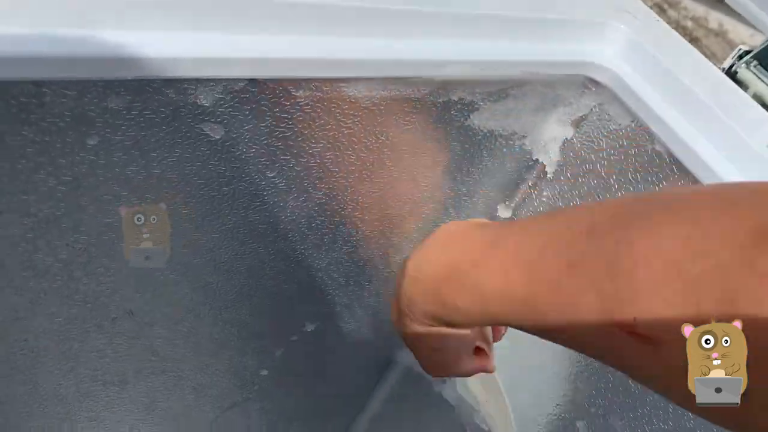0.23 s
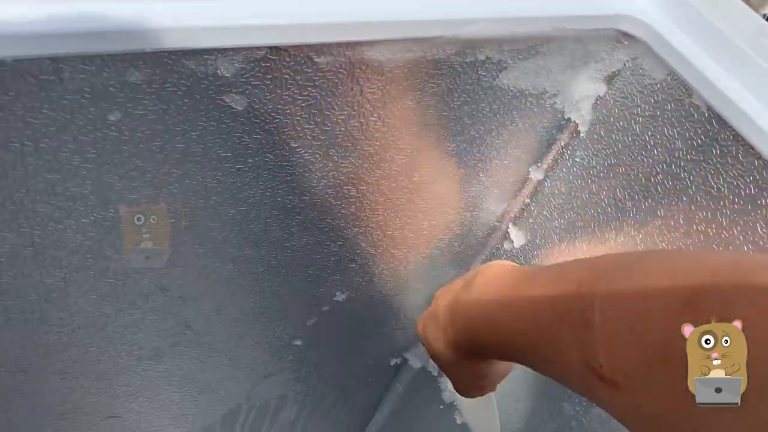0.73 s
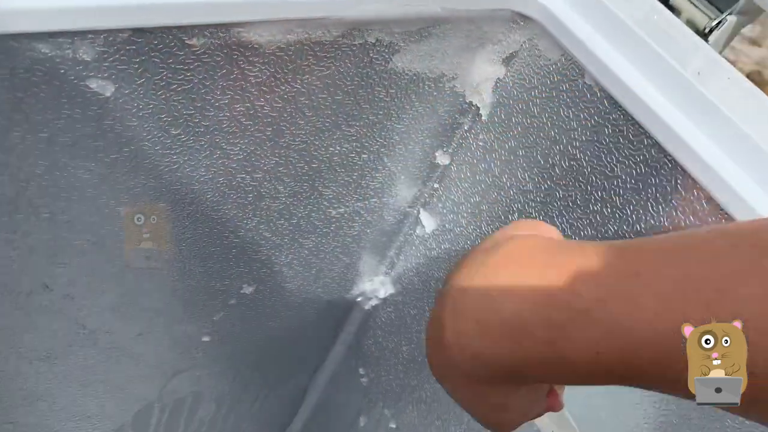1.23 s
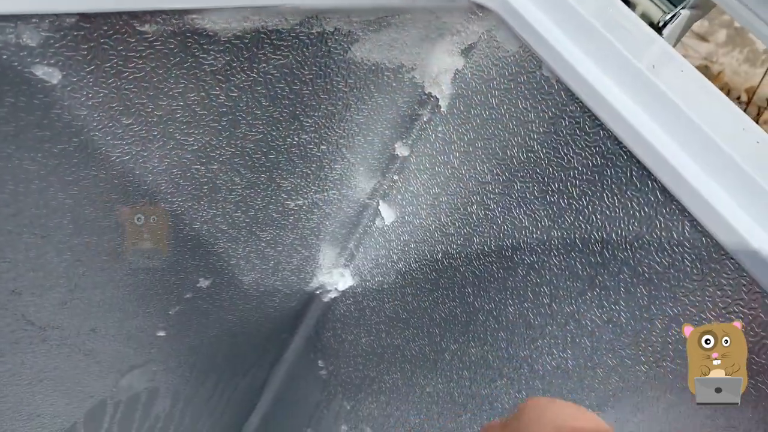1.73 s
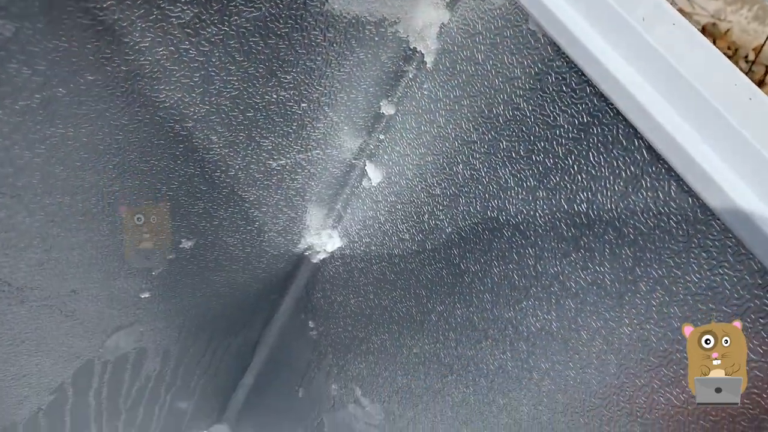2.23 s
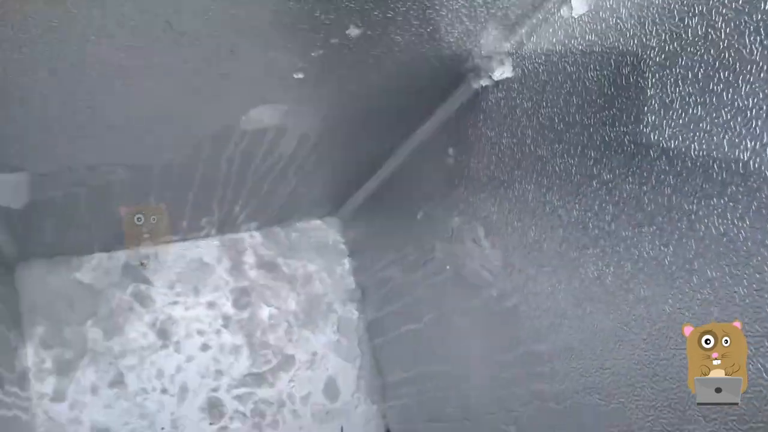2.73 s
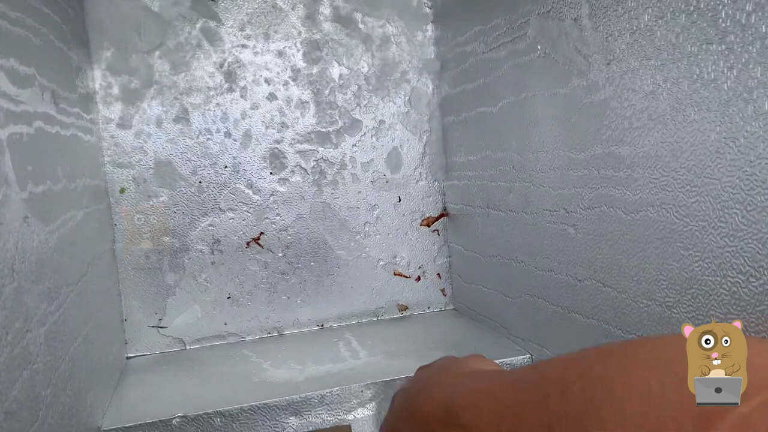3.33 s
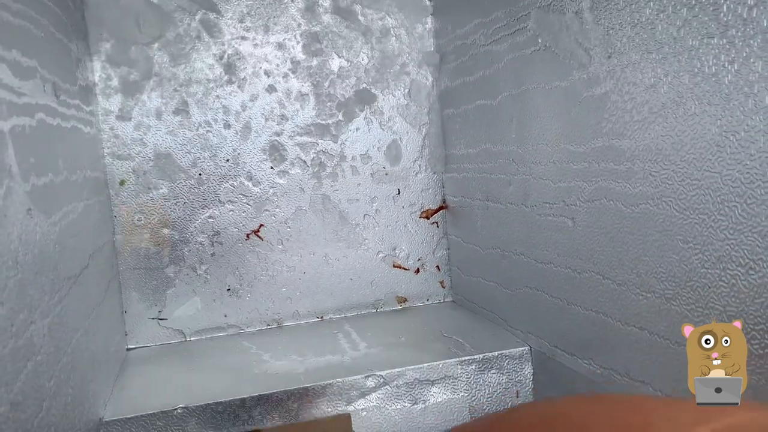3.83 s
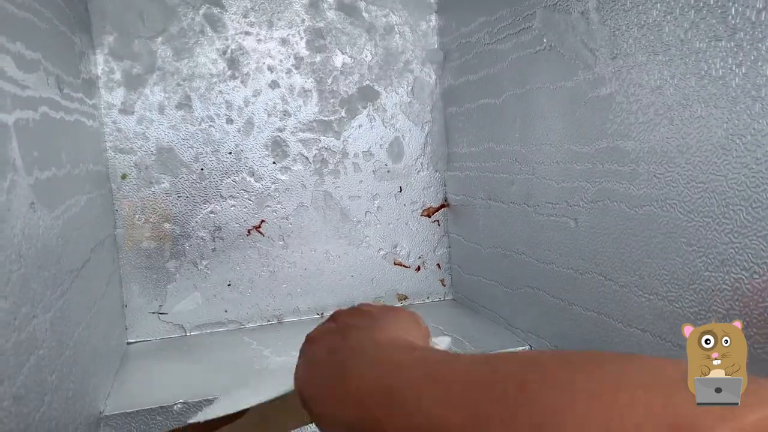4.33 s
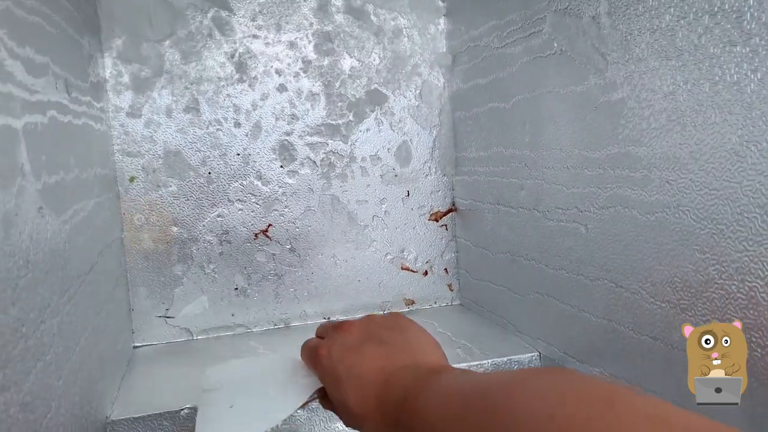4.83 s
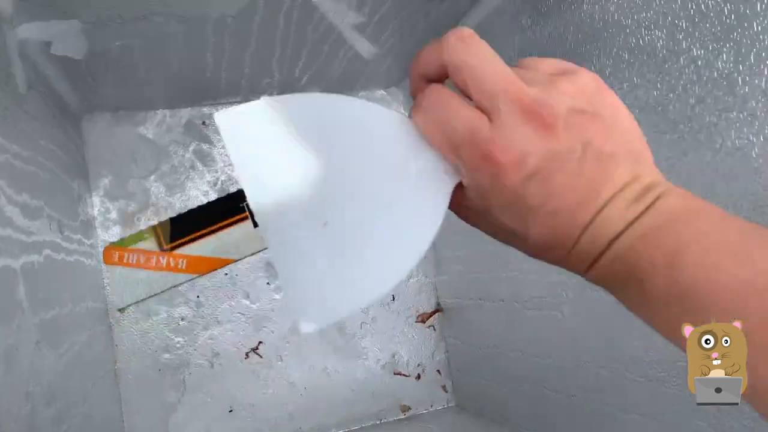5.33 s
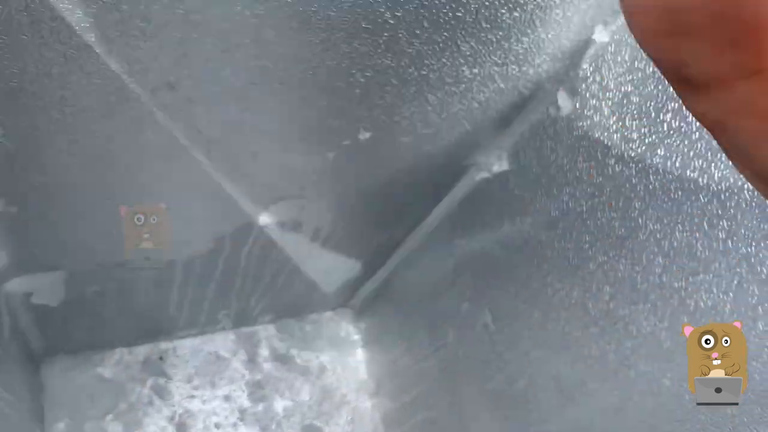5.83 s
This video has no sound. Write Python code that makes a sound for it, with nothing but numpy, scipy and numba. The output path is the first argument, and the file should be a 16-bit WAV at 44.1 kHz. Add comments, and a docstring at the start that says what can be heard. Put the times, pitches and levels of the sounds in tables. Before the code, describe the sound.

Inside an open chest freezer, heard very close in stereo with tight, boxy reflections. From 0 to 1.4 s a plastic scraper shaves frost in short uneven strokes: dry rasp, crunch and bright crystal fizz, the flexing blade ringing around 2 kHz, chips snapping and the liner knocking. A sharp knock lands at 1.54 s, another brief scrape at 1.9 s and a light chip at 2.3 s. A lull follows, with faint rings and thin high squeaks near 2.6 s. From 3.05 to 4 s, deeper scrapes and hard cracks make the bare wall ring, with heavy hollow knocks around 3.6 to 3.85 s. A soft cardboard rub comes near 4.3 s, then small scrapes and a thump at 4.6-4.85 s. Soft low rings end it by 5.6 s. A low hum of about 90 Hz swells and fades throughout, over rumble, hollow rustle and faint outdoor hiss.

```python
"""Inside an open chest freezer, at two close ports, a plastic scraper shaves frost off the liner in short strokes:
random crystal fractures rasp, crunch and fizz, chips snap off, and knocks, lumps and rustles ring wall modes.
The blade rings at first; after a lull of faint rings and thin squeaks, mostly deeper scrapes ring the bare wall.
Near 4.3 s comes a soft rub on a cardboard box; soft rings end it. Throughout, a sine hum swells and fades
in the tub over shaped noise: rumble, hollow rustle, open air and a faint outdoor hiss."""
import sys
import numpy as np
from scipy import signal
from scipy.fft import rfft, irfft, next_fast_len
from scipy.io import wavfile
from scipy.ndimage import uniform_filter1d
from numba import njit

SR = 44100
rng = np.random.default_rng(int(sys.argv[2]) if len(sys.argv) > 2 else 0)


def wav_out(sig):
    """Save sig, one row per channel (or a flat mono array), as 16-bit PCM at SR to the path in sys.argv[1]."""
    wavfile.write(sys.argv[1], SR, np.round(np.clip(np.atleast_2d(sig).T, -1, 1) * 32767).astype(np.int16))


N = 268701
TIME = np.arange(N) / SR

# colour of the finest fractures: f/Hz, level/dB
FIZZ = [(3500, -1), (4800, 0), (6300, 2), (8500, 1.5), (10500, 0.5), (13500, 1), (14400, 2.5), (15000, -9),
        (16000, -23)]
# modes of the liner and the air in it: f/Hz, level/dB, t60/s
LINER = [(73.5, 1, 0.088), (141.7, 2, 0.29), (227.5, 3, 0.22), (242, 1.5, 0.12), (329.5, 5, 0.095),
         (384.6, 0, 0.11), (457.3, -1, 0.063), (525, 4, 0.11), (559.5, 4.5, 0.093), (637.5, -1, 0.091),
         (708, 0, 0.06), (890, -8, 0.17), (964, 4.5, 0.048), (1044, 1.5, 0.068), (1122, -4, 0.12),
         (1400, -16, 0.13), (2638, 0.5, 0.059), (3320, 2, 0.11)]


def from_db(db):
    """Amplitude ratio of a level in dB."""
    return 10 ** (np.asarray(db) / 20)


def rms_one(x):
    """Scale the whole signal to rms 1."""
    return x / np.sqrt(np.mean(x ** 2) + 1e-20)


def in_time(rows):
    """Each column of a curve at every sample."""
    s, *columns = np.transpose(rows)
    return [np.interp(TIME, s, column) for column in columns]


def bell(offset):
    """Bell curve of height 1; the offset is in standard deviations."""
    return np.exp(-.5 * offset ** 2)


def drift(rate):
    """Smooth chance of spread 1 that changes about rate times a second."""
    # drawn at every 40th sample, with a run-in of 2000 draws
    r = np.exp(-80 * np.pi * rate / SR)
    draws = rng.standard_normal(N // 40 + 2002)
    slow = signal.lfilter([1], [1, -2 * r, r * r], draws)[2000:]
    return np.interp(np.arange(N) / 40, np.arange(len(slow)), rms_one(slow))


def colour(x, spectrum, size=8192):
    """Causal filter along a spectrum, falling steeply past its ends; white noise keeps its power."""
    hz, db = np.transpose(spectrum)
    octave = np.log2(np.maximum(np.fft.rfftfreq(size, 1 / SR), 1))
    points = np.log2(hz)
    outside = np.abs(octave - np.clip(octave, points[0], points[-1]))
    level_db = np.interp(octave, points, db) - np.minimum(30 * outside, 60)
    # folding the cepstrum forward gives the minimum-phase response
    cepstrum = irfft(np.log(from_db(level_db)))
    cepstrum[1:size // 2] *= 2
    cepstrum[size // 2 + 1:] = 0
    response = irfft(np.exp(rfft(cepstrum)))
    return signal.oaconvolve(x, response[None] / np.linalg.norm(response), axes=1)[:, :N]


def noise(spectrum):
    """Stereo noise of rms 1."""
    return rms_one(colour(rng.standard_normal((2, N)), spectrum))


def ring(clicks, hz, t60):
    """A unit click sets a sine of height 1 ringing."""
    r, w = from_db(-60 / (t60 * SR)), 2 * np.pi * hz / SR
    return signal.lfilter([0, np.sin(w)], [1, -2 * r * np.cos(w), r * r], clicks + 1e-18)


def tub(x, direct_db=-6, early_t60=0.027, late_t60=0.15, late_db=-14, size=11000):
    """Dense reflections between close walls, unrelated at the two ports: a quick flurry and a weaker tail."""
    t = TIME[:size]
    decay = from_db(-60 * t / early_t60) + from_db(late_db - 60 * t / late_t60)
    response = rng.standard_normal((2, size)) * decay
    response /= np.linalg.norm(response, axis=1, keepdims=True)
    # the direct sound reaches the right port four samples later
    response[0, 0] += from_db(direct_db)
    response[1, 4] += from_db(direct_db)
    response /= np.linalg.norm(response, axis=1, keepdims=True)
    return signal.oaconvolve(x[None], response, axes=1)[:, :N]


def travelling(x, turns_per_s=1.6):
    """As the blade travels, one pattern of reflections gives way to another."""
    angle = 2 * np.pi * turns_per_s * TIME + drift(4.82)
    return tub(x * np.cos(angle)) + tub(x * np.sin(angle))


def scrape(strokes, rasp_colour, resonator, drum_hz, drum_spread,
           drum_db, rasp_db, crunch_db, ring_db, fizz_db):
    """Coarse fractures drum, rasp, crunch and set a resonator ringing; fine ones add a bright fizz."""
    drum, rasp, fizz, ring_share = stroke_gains(strokes)
    coarse = grains(per_s=4500, spread_db=3.3, slip_db=2.1)
    fine = rms_one(coarse + grains(per_s=8000, spread_db=4, slip_db=4))
    wall = drum * drumming(travelling(coarse), drum_hz, drum_spread)
    grating = colour(travelling(coarse * rasp), rasp_colour)
    crunching = tub(crunch() * rasp, direct_db=0.0)
    ringing = ring_share * rms_one(resonator(grating)) * np.std(grating)
    fizzing = colour(travelling(fine * fizz), FIZZ)
    body = from_db(drum_db) * wall + from_db(rasp_db) * grating + from_db(crunch_db) * crunching
    return body + from_db(ring_db) * ringing + from_db(fizz_db) * fizzing


def stroke_gains(strokes):
    """Drumming, rasp and fizz follow contact and pressure; each stroke has its own share of ringing."""
    # the drumming lingers (times the release) and follows only a share of the pressure
    drum_lingers, drum_follows = 1.53, 0.14
    drum, rasp, fizz, ring_share = np.zeros((4, N))
    for start, push_s, release_s, db, rise_db, drum_db, ring_db, fizz_db in strokes:
        pressed_db = pressure(start, push_s, rise_db)
        gain = contact(start, push_s, release_s) * from_db(db + pressed_db)
        shaken_db = db + drum_db + drum_follows * pressed_db
        shaken = contact(start, push_s, drum_lingers * release_s) * from_db(shaken_db)
        # where strokes overlap, the loudest rasp sets the ringing
        ring_share = np.where(gain > rasp, from_db(ring_db), ring_share)
        drum = np.maximum(drum, shaken)
        rasp = np.maximum(rasp, gain)
        fizz = np.maximum(fizz, from_db(fizz_db) * gain)
    return drum, rasp, fizz, uniform_filter1d(ring_share, size=400)


def pressure(start, push_s, rise_db):
    """The hand bears down evenly over the push: dB about its middle."""
    return rise_db * (np.clip((TIME - start) / push_s, 0, 1) - .5)


def contact(start, push_s, release_s, attack_s=0.0088):
    """The stroke bites quickly, holds through the push and eases off."""
    early = np.maximum(start - TIME, 0)
    late = np.maximum(TIME - start - push_s, 0)
    return np.exp(-.5 * np.minimum((early / attack_s) ** 2 + (late / release_s) ** 2, 60))


def grains(per_s, spread_db, slip_db, size=700):
    """Crystals break at random, in clumps as the blade sticks and slips; the mean power stays about 1."""
    sizes_db = spread_db * np.minimum(rng.exponential(1, N), 4) + slip_db * drift(103)
    sizes = from_db(sizes_db) * rng.choice([-1, 1], N)
    clicks = sizes * (rng.random(N) < per_s / SR)
    # level out the power over a window of size samples
    return clicks / np.sqrt(np.abs(uniform_filter1d(clicks ** 2, size)) + 1e-6)


def drumming(shaking, centre_hz, spread):
    """The liner's modes within some octaves of the centre answer the shaking; rms 1."""
    total = 0
    for k, (hz, db, t60) in enumerate(LINER):
        share = from_db(db) / np.sqrt(t60) * bell(np.log2(hz / centre_hz) / spread)
        total = total + (-1) ** k * share * ring(shaking, hz, t60)
    return rms_one(total)


def crunch(per_s=190, spread_db=3.0, cycles=13, low_hz=1400, high_hz=7500, count=18):
    """Larger crystals crack one by one, each ringing briefly at one of several pitches; rms 1."""
    sizes = from_db(spread_db * np.minimum(rng.exponential(1, N), 3)) * rng.choice([-1, 1], N)
    clicks = sizes * (rng.random(N) < per_s / SR)
    dealt = rng.integers(0, count, N)
    pitches = np.geomspace(low_hz, high_hz, count)
    # every pitch dies by 60 dB in the same number of cycles
    return rms_one(sum(hz * ring(clicks * (dealt == k), hz, cycles / hz) for k, hz in enumerate(pitches)))


@njit
def moving_resonance(x, turn, r):
    """A two-pole resonance whose centre (radians a sample) moves."""
    out = np.zeros(len(x))
    for i in range(2, len(x)):
        driven = (1 - r * r) / 2 * (x[i] - x[i - 2])
        out[i] = driven + 2 * r * np.cos(turn[i]) * out[i - 1] - r * r * out[i - 2]
    return out


def blade_flex(x, width_hz=260, wander=0.081):
    """The flexing blade is a resonance whose pitch follows a curve and wanders at random about it."""
    # middle pitch of the flexing blade: t/s, f/Hz
    blade_pitch = [(0.17, 1960), (0.21, 1940), (0.25, 2200), (0.3, 1980), (0.44, 1750), (0.52, 2000),
                   (0.56, 2500), (0.63, 2000), (0.72, 2050), (0.78, 1850), (0.9, 2350), (1.19, 2330),
                   (1.25, 1960), (1.41, 1850), (1.91, 2200), (1.98, 1800), (2.04, 2100)]
    centre = in_time(blade_pitch)[0] * np.exp(wander * drift(24))
    turn, r = 2 * np.pi * centre / SR, np.exp(-np.pi * width_hz / SR)
    return np.array([moving_resonance(side, turn, r) for side in x])


def wall_sheet(x):
    """The bare wall rings at fixed resonances, most of them narrow."""
    # ringing of the bare lower wall: f/Hz, width/Hz, level/dB
    sheet = [(970, 190, 1), (1154, 88, -0.5), (1393, 33, -3), (1590, 84, 1.5), (1706, 53, -3.5),
             (1970, 81, 2), (2556, 43, -2), (3230, 88, -17), (3300, 21, -10), (3750, 57, -11)]
    total = 0
    for k, (hz, width, db) in enumerate(sheet):
        b, a = signal.iirpeak(hz, hz / width, fs=SR)
        total = total + (-1) ** k * from_db(db) * signal.lfilter(b, a, x)
    return total


def chips(rasp_db, fizz_db, snap_db=9, rise_s=0.00079):
    """Each chip breaks away with one sharp snap and a quick, dying run of fractures."""
    # chips snapping off: t/s, rasp level/dB, fizz level/dB, decay of the fractures/s
    chip_rows = [(0.1304, -11.5, -12.5, 0.00095), (0.168, -8, -36, 0.0052), (0.253, -8, -15, 0.013),
                 (0.547, -23, -21, 0.011), (0.584, -5, -11.5, 0.0038), (0.916, -15, -33, 0.0014),
                 (0.938, -30, -22.5, 0.0056), (0.958, -10, -28, 0.0019), (0.975, -4.5, -13.5, 0.0043),
                 (1.091, -24, -34, 0.002), (1.1178, -14, -19, 0.0093), (1.34, -27, -5, 0.0034),
                 (1.5403, -11, -9, 0.0037), (1.552, -22, -31, 0.02), (1.6013, -21.5, -25.5, 0.0053),
                 (1.6591, -14, -23, 0.0037), (1.6900, -38, -35, 0.0043), (1.7235, -25.5, -24.5, 0.003),
                 (1.903, -17, -35, 0.008), (1.912, 1.5, -19, 0.0031), (1.998, -13, -20, 0.0072),
                 (2.2781, -8.5, -16, 0.0088), (3.0474, -9, -23, 0.0041), (3.2054, -30, -35, 0.0048),
                 (3.254, -9, -18, 0.007), (3.301, -14, -32, 0.002), (3.3297, 1.5, -5, 0.0017),
                 (3.385, -4, -24, 0.002), (3.398, -4, -21, 0.0014), (3.402, -6, -4, 0.002),
                 (3.430, -12, -11.5, 0.0028), (3.615, -21, -26.5, 0.0055), (3.621, 1, -5, 0.003),
                 (3.625, -5.5, -5, 0.0026), (3.643, -29, -29, 0.041), (3.693, -19, -31, 0.0091),
                 (3.7393, -49, -36.5, 0.01), (3.83, -7.5, -27, 0.0047), (3.8405, -6.5, -31, 0.0046),
                 (3.8817, -21, -28, 0.0022), (3.908, -4.5, -19, 0.0049), (3.931, -13, -35, 0.0025),
                 (4.324, -15.5, -21.5, 0.0062), (4.609, -24, -19.5, 0.0034), (4.6764, -15.5, -22, 0.0037)]
    runs, snaps = np.zeros((2, 2, N))
    for s, chip_rasp_db, chip_fizz_db, length in chip_rows:
        at, gains = int(s * SR), from_db([chip_rasp_db, chip_fizz_db])
        t = TIME[:min(SR // 2, N - at)]
        run = np.exp(-t / max(length, 1e-4)) * (1 - np.exp(-t / rise_s))
        runs[:, at:at + len(t)] += gains[:, None] * run
        snaps[:, at] += from_db(snap_db) * gains
    cracks = grains(per_s=7000, spread_db=2.8, slip_db=0, size=110)
    rasp, fizz = (travelling(cracks * run) + tub(snap, direct_db=4.5) for run, snap in zip(runs, snaps))
    # f/Hz, level/dB
    chip_colour = [(500, 3.0), (1050, -6), (1400, 0.0), (2300, 4), (3200, 0.5), (4300, -2.0), (5500, -6.0)]
    return from_db(rasp_db) * colour(rasp, chip_colour) + from_db(fizz_db) * colour(fizz, FIZZ)


def catches(level_db, width_hz=300):
    """Quick slips of the edge ring the blade: narrow noise in a short swell, some of it gliding in pitch."""
    # slips of the blade's edge: t/s, level/dB, f/Hz, half length/s, glide/(Hz per s)
    catch_rows = [(0.226, -15.5, 2010, 0.0093, 3000), (0.59, -21, 2320, 0.014, -3000),
                  (0.712, -17, 2055, 0.0074, 0), (0.77, -15, 1857, .007, -4000),
                  (0.979, -21.5, 2420, 0.0046, 0), (1.263, -19, 1810, 0.0086, -8000),
                  (1.344, -12.5, 1937, 0.0071, 0), (1.396, -21, 1810, 0.0079, -3000),
                  (1.543, -17, 2260, 0.0027, 2), (1.919, -16.5, 2180, 0.0033, 2),
                  (1.981, -16.5, 1813, 0.008, -3), (3.412, -21, 1765, 0.016, -9000)]
    out = np.zeros((2, N))
    narrow = signal.butter(2, width_hz / 2, fs=SR, output="sos")
    for s, db, hz, half, glide in catch_rows:
        span = slice(int((s - 4 * half) * SR), int((s + 4 * half) * SR))
        t = TIME[span] - s
        swell = bell(t / half)
        phase = 2 * np.pi * (hz + glide * t / 2) * t
        # two slow noises on cosine and sine make a band of noise about the pitch
        a, b = signal.sosfilt(narrow, rng.standard_normal((2, 2, SR // 3)))[:, :, -len(t):]
        rung = swell * (a * np.cos(phase) + b * np.sin(phase))
        out[:, span] += from_db(db) * rms_one(rung) * np.sqrt(np.mean(swell ** 2))
    return from_db(level_db) * out


def liner_rings(level_db, unlike=0.98, detune=0.0087, size=16000):
    """Each event rings the liner's modes near its own centre, as damped sines that start sharp."""
    # short rings of the liner's modes: knocks, falling lumps, soft rustles, and the body and slips
    # of scrapes: t/s, level/dB, centre of the modes f/Hz, spread/octaves
    ring_rows = [(0.041, -15, 79, 0.44), (.178, -4.5, 510, 0.42), (0.265, -12, 1100, 0.183),
                 (0.275, -7, 252, 0.7), (0.309, -9, 690, 0.49), (0.551, -17.5, 198, 0.41),
                 (.730, -13, 420, 0.59), (.778, -6, 605, 0.56), (1.12, -16.5, 167, 0.76),
                 (1.186, -15, 198, 1.2), (1.245, -11.5, 390, 0.3), (1.28, -16, 553, 0.23),
                 (1.302, -8, 370, 0.32), (1.326, -30, 930, 0.2), (1.39, -24, 550, 0.24),
                 (1.541, -4, 430, 0.9), (1.912, -13.5, 150, 0.47), (1.915, -7, 420, 0.63),
                 (1.997, -16.5, 460, 0.15), (2.279, -22, 296, 0.52), (2.524, -27, 393, 1.1),
                 (2.587, -29.5, 560, 1), (2.623, -32.5, 600, 1.1), (2.698, -28, 283, 0.5),
                 (2.769, -27, 75, 0.4), (3.050, -18, 487, 0.61), (3.069, -14, 1110, 0.11),
                 (3.072, -7, 348, 0.34), (3.255, -8, 1120, 0.13), (3.258, -15.5, 594, 0.25),
                 (3.331, -10, 620, 0.6), (3.359, -9, 700, 0.65), (3.383, -5.5, 700, 0.53),
                 (3.418, -15, 2650, 0.16), (3.428, -10, 2650, 0.21), (3.431, -31, 1400, 0.19),
                 (3.623, -2.5, 223, 0.15), (3.628, -5.5, 635, 0.92), (3.697, -2.5, 596, 0.51),
                 (3.698, 0.5, 297, 0.14), (3.833, -2, 746, 0.42), (3.839, -7.5, 1066, 0.14),
                 (3.842, -10.5, 550, 0.18), (3.927, -11.5, 650, 0.7), (4.333, -20.5, 225, 0.17),
                 (4.422, -18, 270, 0.42), (4.449, -27, 286, 0.17), (4.545, -28.5, 294.9, 0.54),
                 (4.612, -24.5, 318, 0.3), (4.697, -12, 636, 0.26), (4.704, -11, 263, 0.6),
                 (4.798, -25, 650, 0.88), (5.018, -24, 296, 0.31), (5.385, -21, 284, 0.32),
                 (5.441, -21.5, 276, 0.27), (5.497, -24.5, 285, 0.32), (5.61, -22.5, 288, 0.2)]
    # a mode builds up over a few cycles, so the low ones come late;
    # it starts sharp and settles as the wall springs back
    build_cycles, sharp_share, settle_s = 1.1, 0.067, 0.0095
    hz, mode_db, t60 = np.transpose(LINER)[:, :, None]
    t, out = TIME[:size], np.zeros((2, N + size))
    settling = t + sharp_share * settle_s * (1 - np.exp(-t / settle_s))
    envelope = (1 - np.exp(-(t * hz / build_cycles) ** 2)) * from_db(-60 * t / t60)
    # each standing wave reaches the two ports with its own strengths
    ports = 1 + unlike * (-1) ** np.arange(len(hz)) * np.array([[1], [-1]])
    for s, db, centre_hz, spread in ring_rows:
        share = from_db(mode_db) * bell(np.log2(hz / centre_hz) / spread)
        pitch = hz * (1 + detune * rng.standard_normal(hz.shape))
        rings = share / np.linalg.norm(share) * envelope * np.sin(2 * np.pi * pitch * settling)
        at = int(s * SR)
        out[:, at:at + size] += from_db(db) * ports @ rings
    return from_db(level_db) * out[:, :N]


def squeaks(flutter_db):
    """Brief swells of thin, high, fluttering noise."""
    # swells: t/s, level/dB, half length/s
    squeak_rows = [(1.469, -45.5, 0.17), (2.558, -37, 0.02), (2.619, -31.5, 0.014), (2.8, -55, 0.047)]
    # colour: f/Hz, level/dB
    squeak_colour = [(7300, -30), (8200, 22), (8800, 15.5), (9600, 6), (11000, -4.5), (14000, -12)]
    swell = sum(from_db(db) * bell((TIME - s) / half) for s, db, half in squeak_rows)
    return swell * from_db(flutter_db * drift(90)) * noise(squeak_colour)


def hum(level_db, waver=0.5, flutter_db=1.87, port_phase=0.91):
    """A low sine in the tub whose pitch and level waver; the right port leads by port_phase radians."""
    # pitch: t/s, f/Hz
    hum_pitch = [(0.0, 96.1), (0.25, 91.5), (0.54, 96.6), (0.93, 94.6), (1.05, 84.3), (1.15, 89.9),
                 (2.26, 92.3), (2.83, 96.2), (3.0, 93.7), (6.09, 89.5)]
    # level: t/s, level/dB
    hum_level = [(0.0, -32), (0.27, -26), (0.32, -53), (0.39, -29.5), (1.07, -46), (1.15, -29.5),
                 (1.42, -54), (1.91, -30), (1.95, -19), (2.07, -35.5), (2.44, -28), (2.83, -37.5),
                 (3.05, -21), (3.2, -21), (3.32, -30), (3.43, -28), (3.46, -45), (3.61, -26), (4.02, -36),
                 (4.19, -21.5), (4.68, -35.5), (4.76, -22.5), (5.0, -35), (5.12, -21), (5.3, -19),
                 (5.4, -24), (5.58, -24), (5.63, -54), (5.68, -26), (5.95, -34), (6.0, -24), (6.09, -23)]
    turned = 2 * np.pi * np.cumsum(in_time(hum_pitch)[0]) / SR
    phase = turned + waver * drift(3.5) + port_phase * np.array([[0], [1]])
    return from_db(in_time(hum_level)[0] + level_db + flutter_db * drift(8.7)) * np.sin(phase)


def rumble(level_db, gust_db=-1.0):
    """Deep noise whose level wavers."""
    # colour: f/Hz, level/dB
    rumble_colour = [(20, 1), (33, -9.5), (50, 0), (72, 4), (110, -5.5), (160, -13.5), (260, -39)]
    # level: t/s, level/dB
    rumble_level = [(0, -17.5), (.24, -30), (.36, -39.5), (1.22, -42), (1.45, -48), (1.7, -41),
                    (2.5, -40.5), (2.8, -33), (3.5, -47), (4.0, -41.5), (5.2, -36.5), (6.09, -32)]
    return from_db(in_time(rumble_level)[0] + level_db + gust_db * drift(13)) * noise(rumble_colour)


def hollow_rustle(level_db, flicker_db=3):
    """Low, flickering noise around the tub."""
    # colour: f/Hz, level/dB
    hollow_colour = [(110, -14.5), (170, -5.5), (260, 4), (340, -3.5), (420, -22), (600, -27)]
    # level: t/s, level/dB
    hollow_level = [(0, -30), (.25, -30.5), (.9, -47), (1.22, -31.5), (1.45, -40), (2.7, -46), (2.95, -36),
                    (3.5, -54.5), (3.8, -30), (4.15, -48), (4.7, -30.5), (5.0, -36.5), (5.6, -34),
                    (6.09, -40)]
    return from_db(in_time(hollow_level)[0] + level_db + flicker_db * drift(8.4)) * noise(hollow_colour)


def open_air(level_db, breeze_db=0.9):
    """Mid-range noise of the open air, gently wavering."""
    # colour: f/Hz, level/dB
    air_colour = [(300, -4.5), (450, -2), (650, 4), (900, -3.5), (1400, -11.5), (2500, -11), (3500, -14.5)]
    # level: t/s, level/dB
    air_level = [(0, -37.5), (1.8, -44), (2.4, -43.5), (2.8, -41.5), (3.2, -43.5), (3.6, -48.5), (4.2, -45),
                 (5.0, -40.5), (5.6, -40.5), (6.09, -41)]
    return from_db(in_time(air_level)[0] + level_db + breeze_db * drift(4)) * noise(air_colour)


def far_hiss(level_db):
    """Faint treble noise from outdoors, following a slow level curve."""
    # colour: f/Hz, level/dB
    hiss_colour = [(3400, -5.5), (5000, 0), (7000, -4), (9000, -10), (11000, -18.5), (14000, -19.5),
                   (16000, -38.5)]
    # level: t/s, level/dB
    hiss_level = [(0, -44), (1.8, -57.5), (2.4, -55.5), (2.8, -50.5), (3.5, -60.5), (4.2, -54),
                  (5.0, -49.5), (5.5, -53.5), (5.9, -49), (6.09, -50)]
    return from_db(in_time(hiss_level)[0] + level_db) * noise(hiss_colour)


def scene():
    """Strokes, chips, catches and rings of the liner inside the tub, over the background."""
    # strokes: start t/s, push/s, release/s, rasp level/dB, rise of pressure over the push/dB,
    # then relative to the rasp: drumming level/dB, ringing level/dB, fizz level/dB
    stroke_rows = [(0.000, 0.0083, 0.016, -33, -10, 1.5, 10.5, -1),
                   (0.052, 0.036, 0.04, -28.5, -1.5, -10.5, 6.5, -6.5),
                   (0.182, 0.13, 0.019, -18, -2, -1.5, 5.5, -6),
                   (0.394, 0.085, 0.053, -28.5, 7, -5, 0, -8.5),
                   (0.563, 0.048, 0.041, -20.5, 0.5, -3, -0.5, -14.5),
                   (0.657, 0.093, 0.032, -19.5, 6, -3, 8.5, -5.5),
                   (0.818, 0.15, .02, -40, -7, -17, 8.5, -5),
                   (0.973, 0.024, 0.024, -40.5, -5, 0.5, -3, 6.5),
                   (1.151, 0.16, 0.055, -26, 15.5, -2.5, 12.5, -3),
                   (1.918, 0.074, 0.025, -22, 2, 0, 9.5, -6), (3.059, 0.014, 0.0078, -22.5, -8, 2, 1, -7),
                   (3.216, 0.04, .01, -39, 12, 9, 6, -6.5), (3.257, 0.12, .01, -26, 8.5, 6.5, 4, -11.5),
                   (3.394, 0.02, 0.015, -15.5, 1.5, 1.5, 2, -9.5),
                   (3.881, 0.042, 0.012, -29.5, -3, 8.5, 7.5, -5),
                   (3.994, 0.0093, 0.0083, -40.5, -5, 0, 3.5, -9.5),
                   (4.242, 0.082, 0.05, -50, 26, 2, -18, -0.5),
                   (4.611, 0.059, 0.017, -42.5, -6, 1, -15, -2),
                   (4.682, 0.032, 0.017, -39, -11, 10, 4, -11),
                   (4.767, 0.033, 0.016, -39.5, 4, 6.5, 3, -3.5),
                   (4.835, 0.016, 0.017, -41.5, 1.5, -4, -12, -5.5)]
    # colour of the rasp of the first strokes: f/Hz, level/dB
    high_rasp = [(330, 0), (540, -3.5), (800, -3), (1080, -4.5), (1330, -0.5), (1650, 0), (2300, 2),
                 (3200, 1), (4200, 1.5), (5800, -15.5), (7500, -0.5)]
    # colour of the rasp of the later strokes: f/Hz, level/dB
    late_rasp = [(380, -15), (580, -2.5), (850, -8.5), (1100, -6.5), (1300, 1.5), (1750, -3), (2100, -2.5),
                 (2700, -1.5), (3300, 1), (4200, -3.5), (5200, -12), (6500, -25)]
    # from here on mostly deeper scrapes on the bare wall; the soft rub near 4.3 s is on a cardboard box
    late_from_s = 2.7
    high_strokes = [row for row in stroke_rows if row[0] < late_from_s]
    late_strokes = [row for row in stroke_rows if row[0] >= late_from_s]
    high = scrape(high_strokes, high_rasp, blade_flex, drum_hz=448, drum_spread=0.56,
                  drum_db=-3.0, rasp_db=-4.0, crunch_db=-7.5, ring_db=-12.0, fizz_db=2.5)
    late = scrape(late_strokes, late_rasp, wall_sheet, drum_hz=700, drum_spread=0.79,
                  drum_db=-6, rasp_db=-4.5, crunch_db=-9.0, ring_db=-8.5, fizz_db=2.0)
    ice = high + late + chips(rasp_db=-9.0, fizz_db=0.0) + catches(level_db=-0.5)
    liner = liner_rings(level_db=-6.0)
    thin = squeaks(flutter_db=2.5)
    near = hum(level_db=0.0) + rumble(level_db=2.5) + hollow_rustle(level_db=-6.0)
    far = open_air(level_db=-8.0) + far_hiss(level_db=-0.5)
    return ice + liner + thin + near + far


def record(dry):
    """Two microphone ports weight sum and difference by frequency; peaks are rounded, deep bass and top cut."""
    # likeness of the two ports, which swings in the treble: f/Hz, likeness/(-1..1)
    likeness = [(60, .93), (330, .9), (600, .55), (900, .35), (2000, .45), (4000, .25), (5200, 0),
                (6800, .25), (8800, -.55), (9900, .92), (10600, .85), (11500, -.92), (12200, -.92),
                (12950, .95), (13850, .92), (14600, -.92), (16000, -.7)]
    # left minus right at the ports: f/Hz, level/dB
    balance = [(60, 0), (250, -3.5), (550, 1.5), (1000, -1), (2000, 0.9), (4000, 0), (8000, -2),
               (12000, 0.5)]
    size = next_fast_len(N + SR // 10)
    hz = np.fft.rfftfreq(size, 1 / SR)
    alike = np.interp(hz, *np.transpose(likeness))
    lean_db = np.interp(hz, *np.transpose(balance))
    left, right = rfft(dry, size)
    mid = np.sqrt(1 + alike) * (left + right) / 2
    side = np.sqrt(1 - alike) * (left - right) / 2
    ports = np.array([mid + side, mid - side]) * from_db([lean_db / 2, -lean_db / 2])
    heard = irfft(ports, size)[:, :N]
    heard = signal.sosfilt(signal.butter(2, 38, "high", fs=SR, output="sos"), heard)
    rounded = heard / (1 + (heard / .8) ** 4) ** .25
    cutoff_hz = 16300
    return signal.sosfilt(signal.ellip(10, .1, 80, cutoff_hz, fs=SR, output="sos"), rounded)


dry = scene()
out = record(dry)
wav_out(out)
```